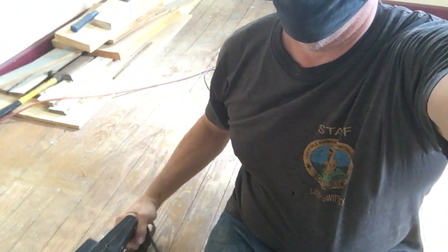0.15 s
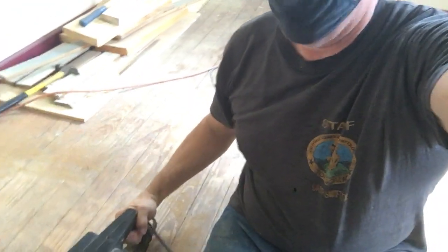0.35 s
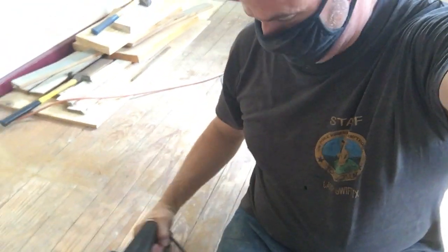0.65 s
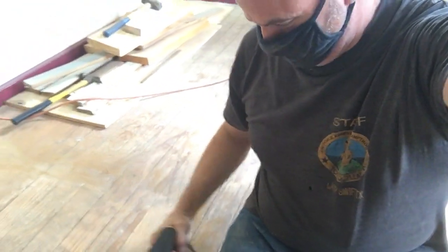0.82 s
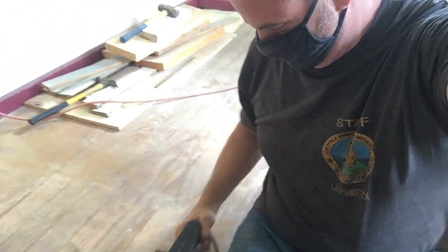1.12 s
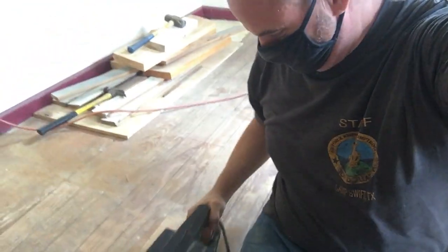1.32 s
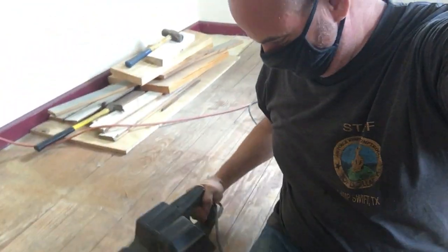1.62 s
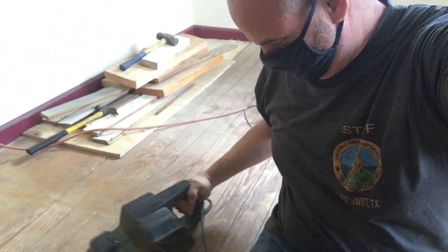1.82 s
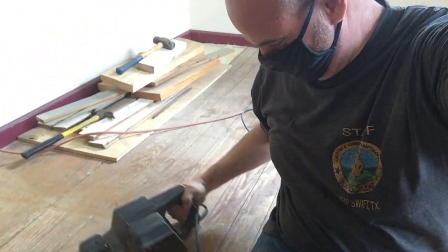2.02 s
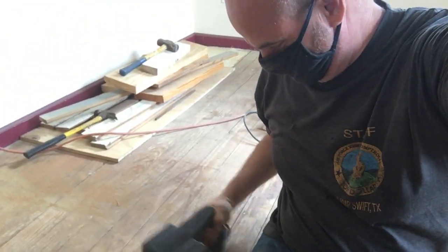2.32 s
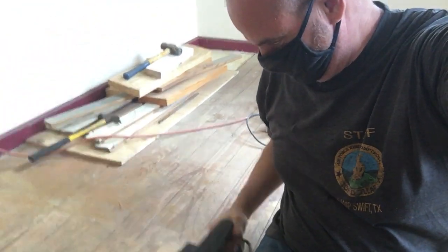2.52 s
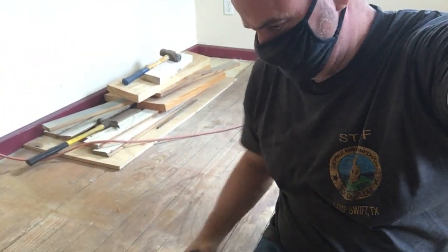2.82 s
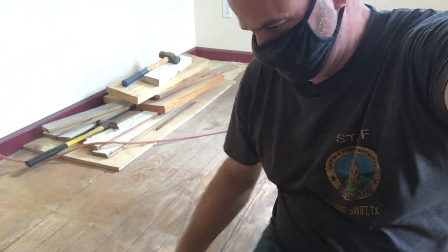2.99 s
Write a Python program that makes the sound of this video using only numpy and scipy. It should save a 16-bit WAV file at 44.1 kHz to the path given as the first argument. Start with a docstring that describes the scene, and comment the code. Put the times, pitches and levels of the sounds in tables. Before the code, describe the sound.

After a fraction of a second of near silence, a belt sander's switch snaps, its motor surges upward in pitch and runs on with a loud high whine and airy hiss, close up in an echoing wooden-floored room.

```python
"""A bare room with a wooden floor, a handheld electric belt sander close to the microphone.
First the idle room and a faint rustle; then the trigger clicks, and knocks and mains-pulsed current ring the housing.
The motor spins up: its eight-bladed cooling fan sings a high whine on a multiple of the shaft rate, over shaft
and gear tones and the shaped noise of drone, belt, rushing air and hiss.
To the end the whine swells and fades as the tool is moved about."""
import sys
import numpy as np
from scipy import signal
from scipy.fft import rfft, irfft, next_fast_len
from scipy.io import wavfile
from scipy.ndimage import map_coordinates

SR = 44100
rng = np.random.default_rng(int(sys.argv[2]) if len(sys.argv) > 2 else 0)


def bounce(signal):
    """Save signal as a 16-bit WAV file at the path given by the first command-line argument."""
    frames = np.transpose(np.atleast_2d(signal))
    limited = np.clip(frames, -1, 1)
    pcm = np.round(limited * 32767).astype(np.int16)
    wavfile.write(sys.argv[1], SR, pcm)


N = 138915

# Place: idle room noise [f/Hz, relative density/dB]; echo of the bare walls [f/Hz, t60/s]
IDLE_SPECTRUM = [(25, -12), (65, -3), (110, -11), (400, -24), (1500, -19), (15000, -46)]
ROOM_DECAY = [(150, 0.26), (2000, 0.77), (6000, 0.22), (15000, 0.072)]
IDLE_DB = -55

# Faint rustle, loudest before the start: [t/s, level/dB]; its colour [f/Hz, relative density/dB]
RUSTLE_LEVEL = [(0, -54), (.09, -78), (.13, -53.5), (.2, -43), (.3, -60)]
RUSTLE_SPECTRUM = [(100, -7), (1500, -2), (2800, -9.5), (7000, -33), (15000, -54)]

# Trigger click: [f/Hz, relative density/dB]
CLICK_SPECTRUM = [(1000, -5), (6000, 3), (9000, -6), (15000, -19)]
CLICK_S, START_S = .209, .2195
# Knocks as the trigger is squeezed and the drive takes up its slack: [t/s, strength/dB]
KNOCKS = [(0.124, -44.5), (0.2213, -14), (0.2273, -23)]
# Modes of the housing: [f/Hz, relative level/dB, t60/s]
HOUSING_MODES = [(291, -23, 0.33), (508, -1.5, 0.17), (940, -4.5, 0.16), (1453, 7.5, 0.058),
                 (1794, 8, 0.027), (2210, -1, 0.04), (2900, -12, 0.02)]
MAINS_PULSE_HZ = 120
INRUSH_DB, INRUSH_S = -27, 0.1  # starting current: initial strength; time in which it drops 4.6 dB

# Noise of the running tool, before a fixed trim of each band:
# [t/s, drone level/dB, belt level/dB, air level/dB, hiss level/dB, finest hiss level/dB]
RUSH_LEVELS = [(0.23, -55, -15, -29, -36, -54), (0.24, -34, -19.5, -34, -47, -57),
               (0.28, -44, -24.5, -30, -33, -48.5), (0.3, -41, -26, -22.5, -29.5, -46.5),
               (0.35, -31, -31, -29.5, -33.5, -43.5), (0.46, -35.5, -31.5, -25.5, -29.5, -45.5),
               (1.02, -42, -31.5, -30.5, -36, -45.5), (1.12, -45.5, -34.5, -34, -34, -48),
               (1.36, -41.5, -38.5, -35, -34.5, -48), (1.54, -49, -42, -37.5, -38.5, -52.5),
               (2.11, -48, -39, -31, -36, -50), (2.29, -45, -38.5, -34, -36, -49.5),
               (2.7, -45.5, -36.5, -35, -39, -49), (2.96, -46.5, -35.5, -34.5, -38, -48),
               (3.07, -38.5, -37, -32.5, -39, -48), (3.15, -46, -33, -32, -40, -48)]
# Colours of those five bands: [f/Hz, relative density/dB]
DRONE_SPECTRUM = [(25, -21), (70, -8.5), (110, -19), (135, 1.5), (185, 2), (240, -0.5), (300, 6),
                  (360, -2.5), (440, -3.5), (600, -7.5), (1200, -27.5)]
BELT_SPECTRUM = [(250, -14), (480, 2), (620, -5), (800, -1.5), (1100, 7.5), (1400, 1), (1750, 2),
                 (2300, -1.5), (4000, -41)]
AIR_SPECTRUM = [(500, -58), (1100, -11.5), (1700, -4.5), (2200, 0), (2700, 2.5), (3350, -6.5), (3700, -2),
                (4400, -4.5), (5000, -12), (6000, -6.5), (10000, -50)]
HISS_SPECTRUM = [(2500, -38), (4500, -12.5), (5300, 1.5), (5600, -8.5), (6100, 3.5), (6700, -1), (7300, 3),
                 (7800, -9.5), (10000, -27)]
FIZZ_SPECTRUM = [(6000, -16), (8000, 3.5), (9900, 5), (10500, 0), (11500, 3.5), (12400, 3.5), (13700, -1.5),
                 (15700, -7.5)]
BELT_TURNS = 0.1  # roller turns per shaft turn
BELT_FLUTTER, SHAFT_FLUTTER = 0.1, 0.11  # depth of each beat in the rush

# Motor speed: [t/s, blade pitch f/Hz]
SPEED = [(0.25, 784.9), (0.28, 1012), (0.31, 1350), (0.35, 1687), (0.4, 1954), (0.47, 2198), (0.55, 2357),
         (0.67, 2479), (0.85, 2538), (1.0, 2550), (1.15, 2523), (1.36, 2480), (1.6, 2479), (1.85, 2499),
         (2.07, 2493), (2.25, 2448), (2.4, 2437), (2.69, 2457), (2.95, 2487), (3.15, 2474)]
REST_HZ = 502.2  # blade pitch on the first turn
BLADES = 8

# Shaft tones, and gear tones before their sway: [multiple of shaft rate, level/dB]
SHAFT_TONES = [(15, -43.5), (17, -47), (23, -50), (25, -58), (41, -61)]
GEAR_TONES = [(1.4, -50), (3.49, -48), (10.47, -51.5), (19.9, -51.5)]
# The pinion's rough mesh: [multiple of shaft rate, dB relative to the mesh level]; mesh [t/s, level/dB]
MESH_TONES = [(11.65, -5.5), (11.85, -3.5), (12, -4)]
MESH_LEVEL = [(0.42, -39), (0.6, -27.5), (1.22, -35), (1.32, -28.5), (1.97, -52), (2.37, -37), (2.43, -27),
              (2.46, -33.5), (3.15, -33.5)]
# Gear tone just under the whine, and tone one shaft order over it: [t/s, level/dB]
UNDERTONE_LEVEL = [(.3, -37), (.43, -31), (.7, -32.5), (1.13, -31), (1.33, -37), (1.65, -34.5),
                   (1.8, -29.5), (2.1, -28), (2.25, -37), (2.38, -31.5), (2.55, -37)]
SIDEBAND_LEVEL = [(.3, -40), (.55, -36), (1.3, -33.5), (1.6, -48), (2.45, -57), (2.95, -28.5), (3.15, -36)]
GEAR_ORDER = 6.98  # undertone, in multiples of the shaft rate

# Blade whine and its octave: [t/s, level/dB]
WHINE_LEVEL = [(0.25, -30), (0.29, -20.5), (0.31, -29), (0.325, -16.5), (0.395, -11), (0.475, -16),
               (0.49, -11), (0.57, -20.5), (0.61, -16.5), (0.67, -21), (0.71, -14.5), (0.765, -12),
               (0.82, -24), (0.84, -10.5), (0.87, -19), (0.91, -26), (0.925, -10.5), (0.945, -34),
               (0.96, -17), (1.04, -13), (1.07, -16.5), (1.095, -11), (1.145, -15.5), (1.165, -27),
               (1.205, -12), (1.26, -21), (1.34, -11.5), (1.37, -17), (1.425, -13), (1.52, -17.5),
               (1.56, -26.5), (1.62, -16.5), (1.725, -22.5), (1.75, -14), (1.855, -21), (1.91, -28),
               (1.95, -27.5), (2.02, -36), (2.065, -21), (2.105, -18.5), (2.135, -23), (2.2, -13.5),
               (2.235, -26.5), (2.285, -16.5), (2.315, -26), (2.425, -17.5), (2.59, -20.5), (2.615, -29),
               (2.655, -17), (2.69, -28), (2.725, -17.5), (2.785, -23.5), (2.85, -15.5), (2.92, -20.5),
               (2.947, -35), (2.96, -11), (2.976, -19.5), (3.03, -24.5), (3.145, -23)]
OCTAVE_LEVEL = [(.26, -31), (.305, -15.5), (.335, -32), (.39, -24.5), (.425, -20.5), (.53, -23.5),
                (.6, -33.5), (.86, -33), (1.09, -29.5), (1.17, -60), (1.25, -31), (1.57, -43),
                (1.64, -31.5), (1.77, -43), (1.85, -35), (2.08, -30.5), (2.32, -36), (2.38, -45),
                (2.47, -37.5), (3.05, -35), (3.09, -25), (3.15, -32)]
# Higher fan overtones, before the vents: [multiple of blade pitch, level/dB, extra at start of spin-up/dB]
BLADE_OVERTONES = [(3, -41.5, 8), (4, -41.5, 6), (5, -50, 20), (6, -59, 30)]
# The vents colour those overtones: [f/Hz, gain/dB]
VENT_RESPONSE = [(5000, -5), (6500, -1), (7400, 2.5), (8300, 2.5), (9200, -3.5), (9900, -3), (10800, -10),
                 (12400, 5), (13600, 0), (15500, -12)]
STRAIN_S = 0.44  # decay constant of the overtones' extra strength
WHINE_ROUGH, SETTLING_ROUGH, SETTLE_S = .2, .42, .7  # lasting and added roughness; its decay constant

# Microphone: rounding level of the peaks, full scale 1; upper band limit
CEILING, TOP_HZ = .76, 15800


def amp(db):
    """Decibels to gain."""
    return 10 ** (np.asarray(db) / 20)


def unit(x):
    """Scale to rms 1."""
    return x / np.sqrt(np.mean(x ** 2) + 1e-20)


def along(points, hz):
    """Read [f/Hz, value] points on a log frequency axis."""
    f, v = np.transpose(points)
    return np.interp(np.log(hz + 1), np.log(f + 1), v)


def clock():
    """The time of every sample in seconds."""
    return np.arange(N) / SR


def curves(rows):
    """One value per sample for each column after the time."""
    s, *cols = np.transpose(rows)
    return [np.interp(clock(), s, c) for c in cols]


def level(rows):
    """Gain per sample from [t/s, level/dB] rows."""
    return amp(curves(rows)[0])


def wobble(rate):
    """A smooth random curve, rate knots a second."""
    return map_coordinates(rng.standard_normal(4096), [clock() * rate], mode='wrap')


def filtered(x, response):
    """x shaped by a gain that depends on frequency."""
    m = next_fast_len(N + SR // 2)
    gain = response(np.fft.rfftfreq(m, 1 / SR))
    return irfft(rfft(x, m) * gain, m)[:N]


def noise(spectrum, grit=0):
    """Coloured noise of rms 1; grit clumps it into tiny ticks."""
    x = rng.standard_normal(N) * np.exp(grit * wobble(1200))
    return unit(filtered(x, lambda hz: amp(along(spectrum, hz))))


def tone(angle, rough, rate):
    """A line of rms about 1 that turbulence shakes in level and phase."""
    in_phase = (1 + rough * wobble(rate)) * np.cos(angle)
    quadrature = rough * wobble(rate) * np.sin(angle)
    return (in_phase + quadrature) / np.sqrt(.5 + rough ** 2)


def running(rise_s):
    """0 before the start, then rising exponentially towards 1."""
    return 1 - np.exp(-np.maximum(clock() - START_S, 0) / rise_s)


def in_room(x, wet_db):
    """Direct sound plus the bare walls' answer, noise dying faster or slower by band, at equal power."""
    hz, t, z = signal.stft(rng.standard_normal(SR // 2), SR, nperseg=256)
    decay = amp(-60 * t / along(ROOM_DECAY, hz)[:, None])
    tail = signal.istft(z * decay, SR, nperseg=256)[1]
    echo = signal.fftconvolve(x, tail / np.linalg.norm(tail))[:N]
    return (x + amp(wet_db) * echo) / np.sqrt(1 + amp(wet_db) ** 2)


def idle_room():
    """The steady coloured noise of the place."""
    return amp(IDLE_DB) * noise(IDLE_SPECTRUM)


def rustle():
    """A faint rustle: slightly gritty noise of changing level."""
    return level(RUSTLE_LEVEL) * noise(RUSTLE_SPECTRUM, grit=0.17)


def trigger_click():
    """The switch snaps: bright noise that dies 60 dB in 30 ms."""
    age = clock() - CLICK_S
    return amp(-33 - 60 * np.abs(age) / 0.03) * (age > 0) * noise(CLICK_SPECTRUM)


def housing_jolt():
    """Knocks and the pulsing starting current strike the housing, which cracks and rings in its modes."""
    pulse_s = np.arange(1, 30) / MAINS_PULSE_HZ
    buzz = [(START_S + s, INRUSH_DB - 4.6 * s / INRUSH_S) for s in pulse_s]
    blows = np.zeros(N)
    for s, db in [*KNOCKS, *buzz]:
        blows[round(s * SR)] += amp(db + rng.normal(0, 1))
    t = np.arange(SR // 4) / SR
    ring = sum(amp(db - 60 * t / t60) * np.sin(2 * np.pi * hz * t) for hz, db, t60 in HOUSING_MODES)
    crack = amp(-11 - 60 * t / 0.0037) * rng.standard_normal(len(t))
    jolt = signal.fftconvolve(blows, amp(-8.5) * ring + crack)[:N]
    return signal.sosfilt(signal.butter(2, 220, 'highpass', fs=SR, output='sos'), jolt)


def start():
    """Click and jolt with the same answer from the room."""
    return in_room(housing_jolt() + trigger_click(), wet_db=-3)


def shaft_angle():
    """The motor's angle in radians: its speed summed, with a slight random unsteadiness."""
    blade_hz, = curves([(START_S, REST_HZ), *SPEED])
    drift = .0012 * wobble(35)
    return 2 * np.pi * np.cumsum(blade_hz * (1 + drift)) / BLADES / SR


def rush(angle):
    """Motor drone, belt, cooling air and gritty hiss, beating with the roller and the shaft."""
    drone_db, belt_db, air_db, hiss_db, fizz_db = curves(RUSH_LEVELS)
    drone = amp(drone_db + 1.0) * noise(DRONE_SPECTRUM, grit=0.41)
    belt = amp(belt_db + 2) * unit(in_room(noise(BELT_SPECTRUM, grit=0.44), wet_db=-10.5))
    air = amp(air_db + 7.5) * unit(in_room(noise(AIR_SPECTRUM, grit=0.26), wet_db=-10.0))
    hiss = amp(hiss_db + 0.5) * noise(HISS_SPECTRUM, grit=0.2)
    fizz = amp(fizz_db + 10.0) * noise(FIZZ_SPECTRUM, grit=0.12)
    beat = 1 + BELT_FLUTTER * np.cos(BELT_TURNS * angle) + SHAFT_FLUTTER * np.cos(angle)
    started = drone * running(0.11) + belt * running(0.026) + (air + hiss + fizz) * running(0.0016)
    return started * beat


def drive(angle):
    """Clean tones on both sides of the whine, the shaft's unevenness and the rougher tones of the gears."""
    undertone = level(UNDERTONE_LEVEL) * tone(GEAR_ORDER * angle, rough=.15, rate=44)
    sideband = level(SIDEBAND_LEVEL) * tone((BLADES + 1) * angle, rough=0.3, rate=60)
    shaft = sum(amp(db) * tone(k * angle, rough=0.96, rate=27) for k, db in SHAFT_TONES)
    gears = sum(amp(db) * tone(k * angle, rough=1.0, rate=60) for k, db in GEAR_TONES)
    mesh = sum(amp(db) * tone(k * angle, rough=1.0, rate=70) for k, db in MESH_TONES)
    mesh = level(MESH_LEVEL) * mesh
    # the gear tones sway with the belt's level
    belt_db = curves(RUSH_LEVELS)[1]
    sway = amp(1.08 * (belt_db - np.median(belt_db)))
    roomy = in_room(shaft + mesh + gears * sway, wet_db=-3.0)
    return (undertone + sideband + roomy) * running(0.13)


def fan(angle):
    """Eight blades pass per turn: a whine, rough until the motor settles, its octave and vented overtones."""
    age = np.maximum(clock() - START_S, 0)
    rough = WHINE_ROUGH + SETTLING_ROUGH * np.exp(-age / SETTLE_S)
    whine = level(WHINE_LEVEL) * tone(BLADES * angle, rough=rough, rate=150)
    octave = level(OCTAVE_LEVEL) * tone(2 * BLADES * angle, rough=0.67, rate=130)
    # higher overtones are stronger during the spin-up and swell with the finest hiss
    strain = np.exp(-age / STRAIN_S)
    overtones = sum(amp(db + extra_db * strain) * tone(k * BLADES * angle, rough=0.85, rate=150)
                    for k, db, extra_db in BLADE_OVERTONES)
    fizz_db = curves(RUSH_LEVELS)[-1]
    swell = amp(0.37 * (fizz_db - np.median(fizz_db)))
    vented = filtered(overtones * swell * running(0.07), lambda hz: amp(along(VENT_RESPONSE, hz)))
    near = in_room((whine + octave) * running(.02), wet_db=-17)
    return near + in_room(vented, wet_db=1.5)


def scene():
    """The sander over the idle room and a faint rustle; all rotating tones share one shaft angle."""
    angle = shaft_angle()
    background = idle_room() + rustle()
    sander = fan(angle) + drive(angle) + rush(angle) + start()
    return (background + sander)[None]


def record(dry):
    """The microphone rounds off the highest peaks and passes nothing from its band limit upwards."""
    held = dry[0] / (1 + np.abs(dry[0] / CEILING) ** 8) ** (1 / 8)
    return filtered(held, lambda hz: hz < TOP_HZ)[None]


dry = scene()
out = record(dry)
bounce(out)
```